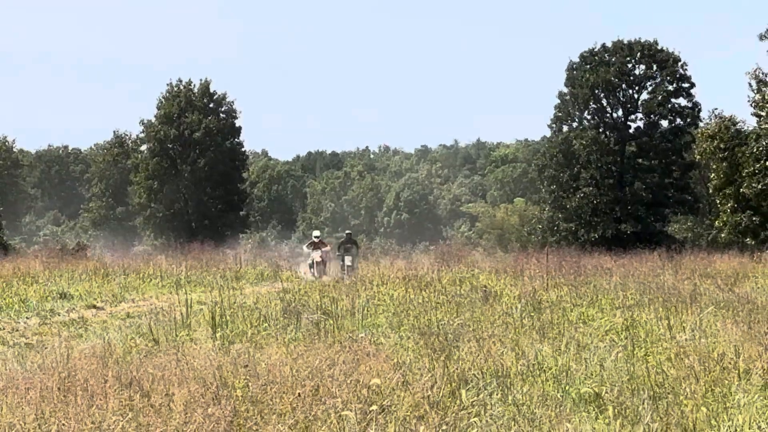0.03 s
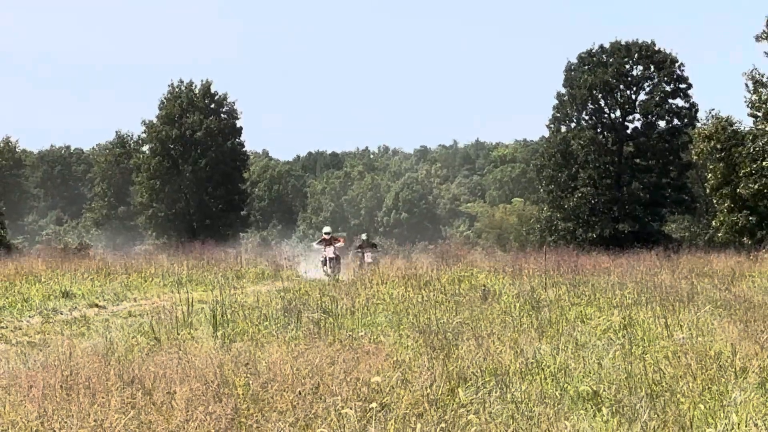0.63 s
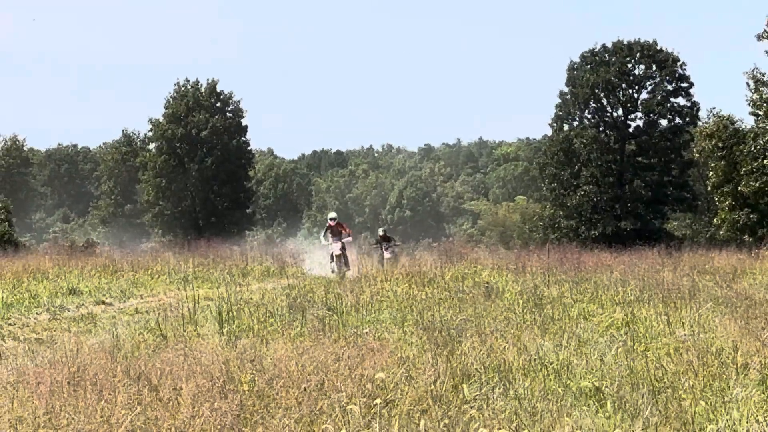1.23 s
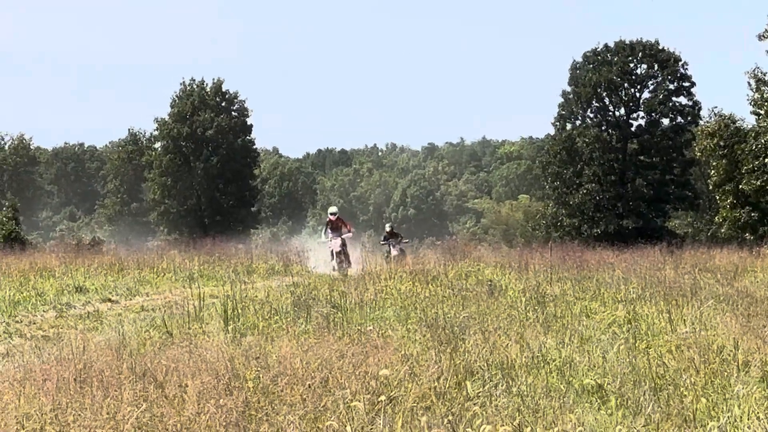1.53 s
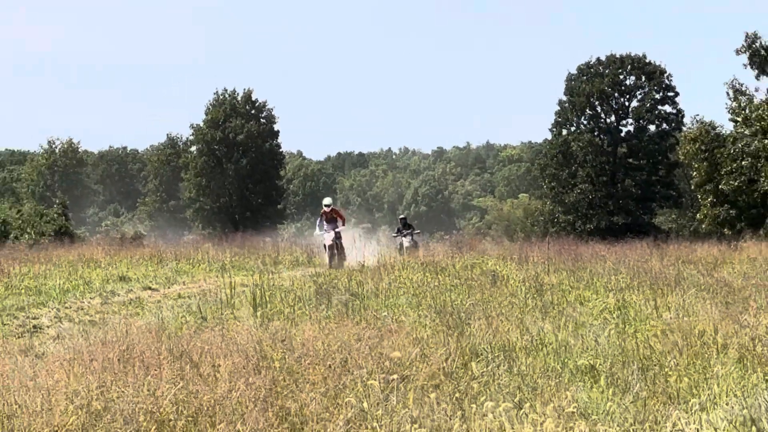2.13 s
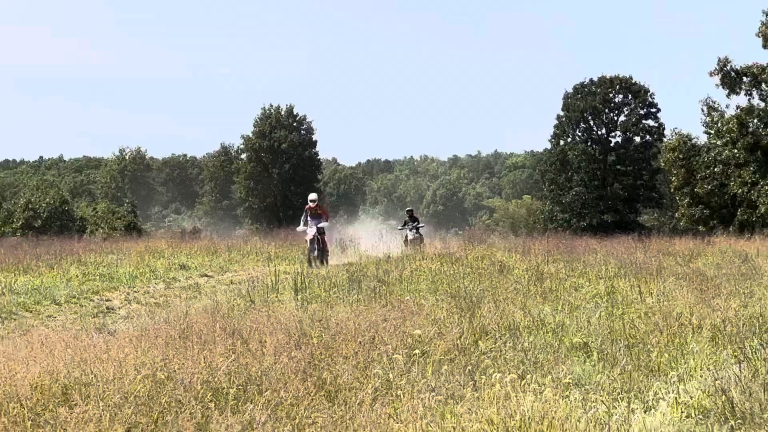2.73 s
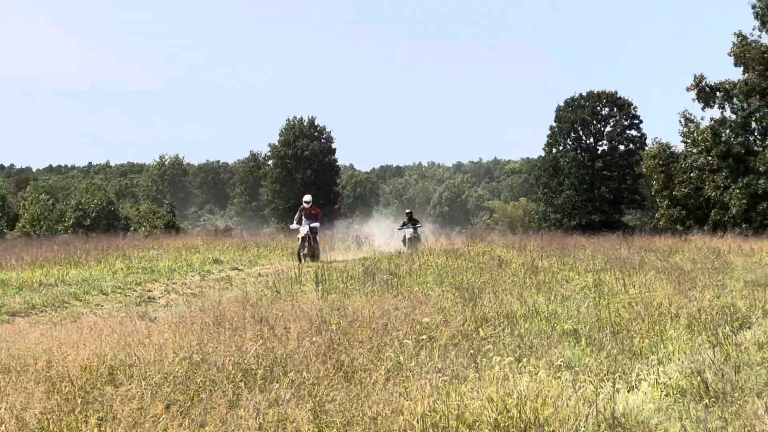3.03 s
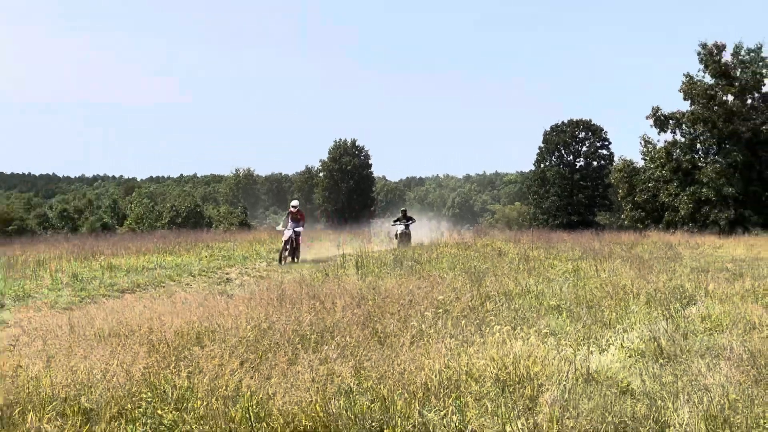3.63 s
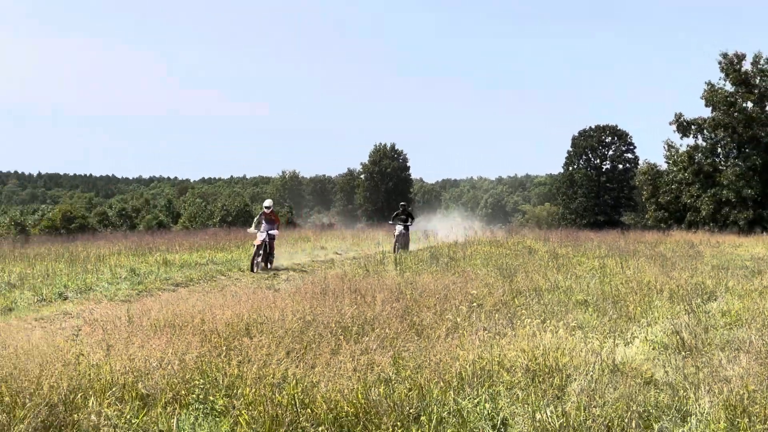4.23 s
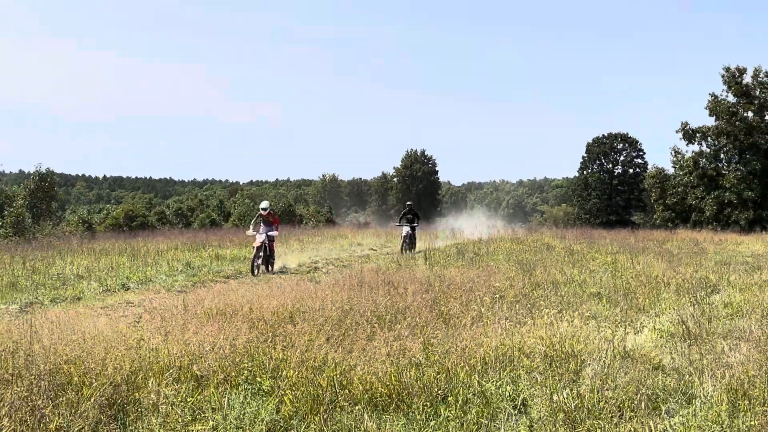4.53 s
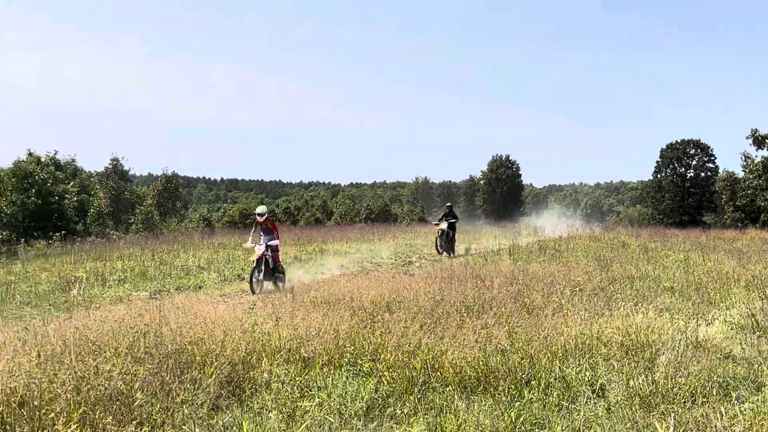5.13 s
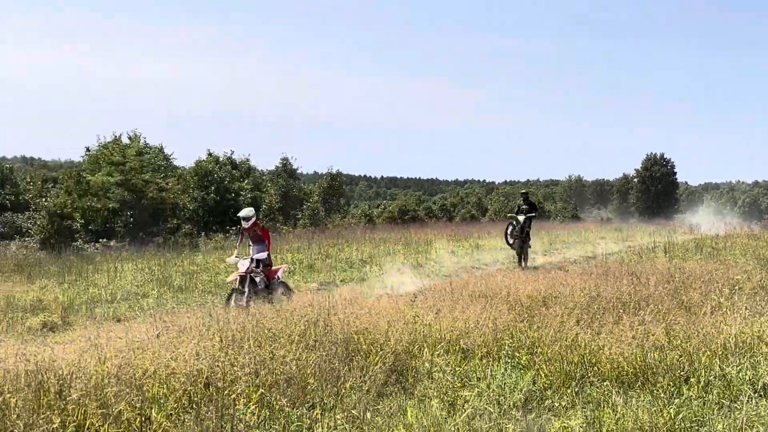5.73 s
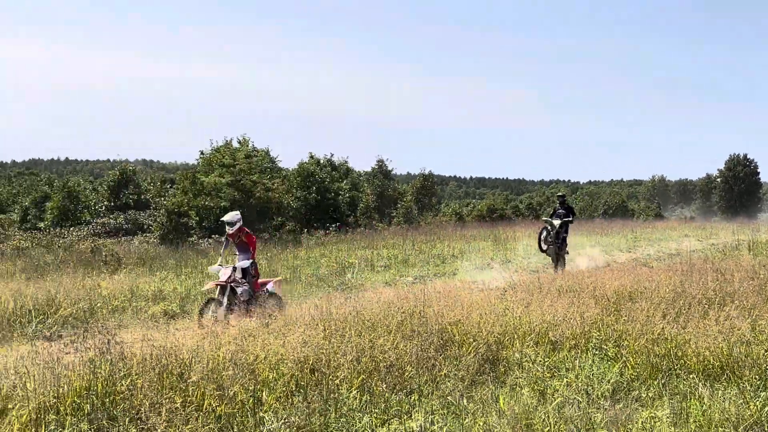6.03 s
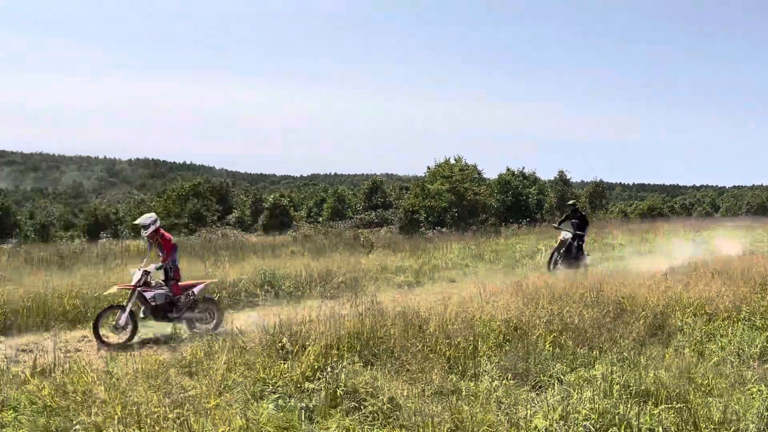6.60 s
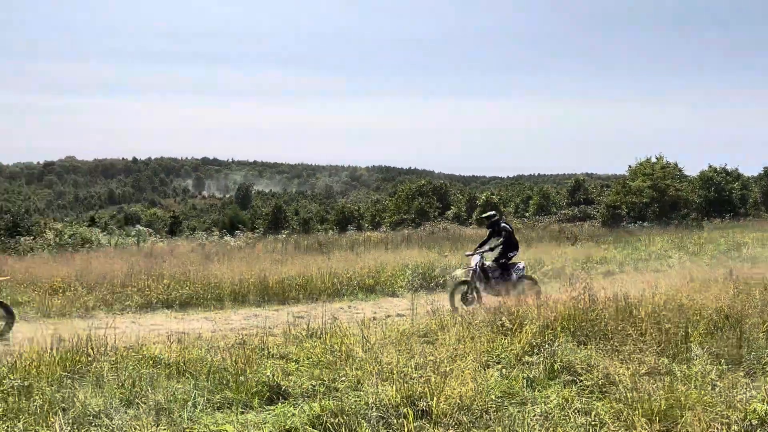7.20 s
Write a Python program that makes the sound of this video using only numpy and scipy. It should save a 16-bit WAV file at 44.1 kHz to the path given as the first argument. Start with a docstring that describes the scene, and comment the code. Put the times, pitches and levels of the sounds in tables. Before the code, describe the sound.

Two dirt bikes approach across an open field, revving in bursts and growing loud as they pass, over insects and low wind rumble.

```python
"""Two dirt bikes crossing a field

The leader blips its throttle and coasts past; the second follows, its revs rising and sagging over bumps.
Each exhaust is a periodic source, radiating orders (harmonics) of its firing rate. The firings also
modulate the noise of gas puffs and engine rasp, and chains and tyres hiss as the distance closes.
Insects buzz and tick in the grass over a low rumble of wind and far engines."""
import sys
import numpy as np
from scipy.fft import rfft, irfft, next_fast_len
from scipy.io import wavfile
from scipy.ndimage import uniform_filter1d, map_coordinates

SR = 44100
rng = np.random.default_rng(int(sys.argv[2]) if len(sys.argv) > 2 else 0)


def wav_out(sig):
    """Save sig, one row per channel (or a flat mono array), as 16-bit PCM at SR to the path in sys.argv[1]."""
    wavfile.write(sys.argv[1], SR, np.round(np.clip(np.atleast_2d(sig).T, -1, 1) * 32767).astype(np.int16))


N = 324576
TIME = np.arange(N) / SR

# strength of the rumble (time [s], level [dB])
RUMBLE_LEVEL = [(0, -37.5), (2.9, -37), (4.7, -36.5), (6.5, -35.5), (7.36, -27.5)]
# low thuds: air bumping the microphone at 3.16 s, the second bike's front wheel landing at 6.52 s (time [s],
# half-length [s], level [dB])
THUDS = [(3.16, 0.044, -26), (6.52, .025, -25)]
# spectra of the rumble and the far engines' murmur (frequency [Hz], relative density [dB])
RUMBLE_SPECTRUM = [(15, -35.5), (25, -56), (43, 4), (102, 1), (145, 2.5), (164, 1.5), (179, -12.5),
                   (203, -6.5), (248, -18.5), (281, -28.5), (311, -26), (500, -41), (650, -49),
                   (1100, -120)]
MURMUR_SPECTRUM = [(150, -14), (260, 8), (400, -0.5), (580, 0), (720, -7.5), (900, -8), (1100, -11),
                   (1350, -7), (2000, -57)]
# spectra of the insects (frequency [Hz], relative density [dB])
CHORUS_SPECTRUM = [(6400, -33), (7000, -13.5), (8000, 5), (8720, 8), (8950, -25), (9500, -30), (10600, -17),
                   (14000, -23.5), (15500, -14)]
BUZZER_SPECTRUM = [(6000, -12.5), (9000, -0.5), (10700, 10), (12000, 6), (14000, -3), (15600, -1)]
TICK_SPECTRUM = [(4000, -16), (8000, -9), (10000, 10.5), (14000, -2), (16000, 5)]
# ticks in the grass (time [s], relative peak level [dB])
TICKS = [(1.3693, -55), (1.998, -50.5), (2.0971, -54), (2.2333, -62), (2.386, -53), (2.507, -47.5),
         (2.6763, -47), (2.813, -54), (2.953, -56), (3.259, -54)]

# spectra of gas puffs, engine rasp and chain and tyre hiss (frequency [Hz], relative density [dB])
PUFF_SPECTRUM = [(150, -6), (260, 10), (400, -1), (500, -4.5), (620, 1), (850, -3), (1100, -7.5),
                 (1350, -1), (2000, -77)]
RASP_FAR = [(590, -27), (1000, -24), (1190, -15), (1360, -2), (1530, 4.5), (2070, -2.5), (2540, -3),
            (2920, -9), (3600, -10), (4680, -34), (7920, -120)]
RASP_HEAD_ON = [(590, -33), (1000, -10.5), (1290, -5), (1370, -7), (1470, 2.5), (1640, 0), (1980, -2.5),
                (2140, 0), (2560, -7.5), (2830, -4), (3800, -19), (4940, -44.5), (8360, -120)]
RASP_NEAR = [(590, -46), (1000, -3.5), (1180, 2), (1380, -2.5), (1470, 5.5), (1960, 6.5), (2290, -4.5),
             (2540, 2), (3070, -10), (3600, -18), (4680, -45), (7920, -120)]
RASP_ABEAM = [(590, -34), (1000, 8), (1220, 7), (1580, -0.5), (1760, 8.5), (1920, 0), (2270, 7.5),
              (2450, -2), (2660, 5.5), (3020, -10.5), (3400, -4.5), (4420, -39), (7480, -120)]
HISS_AHEAD = [(2400, -28.5), (3200, 0), (4000, 2), (5200, 2), (6600, 1), (7600, -2), (9500, -8.5),
              (11000, -16), (13500, -10), (16000, -14)]
HISS_ABEAM = [(2500, -45), (3200, -5), (4000, 2), (5200, 2.5), (6000, 6.5), (6700, 2.5), (8000, -1.5),
              (9500, -7), (11000, -26), (13500, -10), (16000, -11.5)]
# surges of rasp and hiss (time [s], half-length [s], added part re steady level [dB])
SURGES = [(4.55, 0.14, -5), (5.47, 0.057, -4.5), (5.89, 0.027, -6.5), (6.26, 0.011, -32),
          (6.41, 0.013, -23.5)]

# the second engine's revs (time [s], firing rate [Hz])
SECOND_REVS = [(0, 55), (.42, 55.5), (.63, 63), (.76, 62), (.95, 55), (2, 57), (2.25, 62), (2.6, 58),
               (2.9, 62), (3.27, 59.5), (3.42, 66.5), (3.5, 61), (3.6, 62.6), (3.75, 62), (3.88, 64),
               (4.15, 63.8), (4.22, 60.3), (4.42, 65), (4.58, 66), (4.75, 60), (4.85, 60.4), (4.91, 59.3),
               (4.97, 60), (5.3, 61), (5.6, 58.5), (5.84, 65), (6.2, 60), (6.51, 57), (6.58, 58.6),
               (6.72, 59.8), (6.8, 63.8), (6.88, 55.5), (7.05, 60.8), (7.17, 55.5), (7.28, 63.5),
               (7.36, 55.3)]
# its throttle twists (time [s], hold [s], opening [0-1], extra exhaust level [dB])
SECOND_TWISTS = [(.5, .41, 0, 11), (2.68, .4, .5, 3), (3.28, .15, .3, 5), (3.49, .5, 0, 4),
                 (4, .18, .55, 5.5), (4.29, .33, .65, 6.5), (4.68, .36, .5, -1), (5.1, .24, .1, 4),
                 (5.68, .16, 1, 3), (6.54, .17, 0, 6.5), (6.71, .09, 0, 5.5), (6.93, .15, .4, 2.5),
                 (7.19, .17, .3, 3)]
# harmonics of its pipe and its gears (order [x firing rate], relative level [dB])
SECOND_ORDERS = [(2, -7), (4, 2), (6, -11), (8, -10), (10, 0), (12, 1.5), (14, -6.5), (16, -10), (18, -13),
                 (20, -10), (22, -24), (28, -27)]
GEAR_ORDERS = [(46, -4), (48, 0)]
# colouring of its pipe by ground reflection (frequency [Hz], gain per doubling of distance [dB])
GROUND_REFLECTION = [(250, -1), (500, 0), (630, 1.2), (760, 0), (890, 1), (1020, -4.5), (1130, -3.5),
                     (1260, 0)]
# booms in its pipe at short throttle twists (time [s], level [dB])
PIPE_BOOMS = [(2.22, -50.5), (2.82, -48.5), (3.38, -54)]
# casing resonances that its whine sweeps through (frequency [Hz], gain [dB])
CASING_RESPONSE = [(1300, -14), (1450, -5), (1720, 2), (2000, -9), (2380, -13), (2600, -21), (2860, -15),
                   (3150, -26), (3540, -15), (3900, -24)]
# swells of its whine and its gears' song (time [s], half-length [s], level [dB])
WHINE_SWELLS = [(4.42, 0.13, -50.5), (4.9, 0.33, -49), (5.6, 0.25, -43), (6.9, .25, -56)]
GEAR_SWELLS = [(4.29, .06, -60), (4.9, .17, -47)]
# its intake rattle from afar (time [s], level [dB])
INTAKE_LEVEL = [(.1, -59), (.5, -55.5), (.64, -52.5), (.73, -52), (.84, -65), (1.05, -66), (1.12, -57.5),
                (1.25, -62.5), (1.45, -65), (1.55, -71), (1.7, -73), (2.3, -58.5), (3.05, -57), (3.4, -76),
                (4, -92)]
# resonance of its airbox (frequency [Hz], relative density [dB])
AIRBOX_SPECTRUM = [(800, -28), (1200, -3.5), (1500, 8.5), (1850, -0.5), (2200, -24), (3000, -50)]

# the leader's throttle blips (time [s], hold [s], opening [0-1], target firing rate [Hz],
# spin-up [s], coast-down [s], extra exhaust level [dB])
LEAD_BLIPS = [(3.87, 0.14, 0.65, 83, 0.095, 0.078, 5), (4.895, .17, 1, 93.5, .09, .24, -.5),
              (5.06, .32, .7, 66, .15, .2, 1), (5.52, .13, .7, 68.5, .07, .12, -2),
              (5.825, .21, .95, 69, .06, .22, -3), (6.19, .17, 1, 71, .055, .1, -1.5),
              (6.36, .11, 1, 72.4, .04, .3, .5), (6.49, .3, 0.02, 55.7, 0.12, 0.056, 6),
              (6.889, .15, 0.07, 62, .03, 0.38, 9), (7.03, 0.3, 0.12, 53.4, .22, 0.29, 8.5)]
# response of its pipe, throttle shut and open (frequency [Hz], gain [dB])
PIPE_SHUT = [(55, -24.5), (70, -9), (100, -10), (120, 2.5), (160, -5), (185, -10), (240, -11.5),
             (300, -14.5), (400, -25)]
PIPE_OPEN = [(70, -10.5), (90, -7.5), (135, -5), (185, 2.5), (215, 0.5), (265, 9), (290, -6.5), (345, -7),
             (375, -13), (450, -17)]
# overtone peaks of its pipe (frequency [x PIPE_TUNED_HZ], gain [dB])
PIPE_OVERTONES = [(6, -14), (7, -5), (8, -7), (10.4, 0), (11.5, -8), (13, -7), (14.4, -4), (15.5, -10),
                  (17.3, -4), (23, -12), (28, -17), (40, -22)]
# colouring of its pipe by the grass (frequency [Hz], gain per doubling of distance [dB])
GRASS_RESPONSE = [(160, 0), (210, 1.5), (260, -4), (350, -4)]
# barks of its intake (time [s], half-length [s], level [dB])
BARKS = [(4, .035, -54.5), (5.01, 0.014, -39), (5.12, 0.15, -36), (5.88, .03, -29.5), (6.41, 0.1, -25.5)]
# spectrum of a bark (frequency [Hz], relative density [dB])
BARK_SPECTRUM = [(250, -22), (400, -10), (700, -2), (1150, -1.5), (1400, -1), (1700, 4), (2050, -9),
                 (3000, -15.5), (5500, -13), (8000, -33)]

# left-right likeness of noise from ahead and side-on (frequency [Hz], coherence [0-1])
COHERENCE_AHEAD = [(200, .99), (700, .85), (1200, .7), (1650, .45), (2200, .95), (3300, .9), (4000, .99)]
COHERENCE_ABEAM = [(800, .8), (1400, .5), (1900, .4), (2500, .7), (7000, .5), (9000, .85), (13000, .97)]
# contrast of the two microphone ports (frequency [Hz], left phase lead [rad], left minus right [dB])
PORTS_FAR = [(300, 0, 0), (700, 0, -1.5), (1200, -1.7, -7), (1650, -1.5, -6), (2100, 0, 0)]
PORTS_NEAR = [(700, 0, 0), (950, -.4, -3), (1300, -.7, -2), (1650, -1.3, -1.2), (1900, -.5, 2.5),
              (2300, 0, .8), (3200, .4, .4), (4000, 0, .2)]
PORTS_ABEAM = [(400, 0, .6), (550, .6, 2.7), (800, .6, 3.7), (1100, .9, 0), (1550, 1.8, -4), (2200, 0, -1),
               (3200, .8, 2), (4400, 0, .5), (6000, .3, 4.5), (9000, 0, 0)]
# treble phase between the channels (frequency [Hz], left phase lead [rad])
TREBLE_PHASE = [(6800, 0), (7450, 3.14), (7900, 5.4), (8300, 6.1), (9200, 5.9), (10200, 3.6), (12200, 3),
                (13400, 0)]

# straight passes (time abeam [s], speed [m/s], closest distance [m])
LEAD_PASS, SECOND_PASS = (6.578, 7.76, 6.3), (7.452, 7.54, 6.49)
# level laws (gain when closest [dB], loss per doubling of distance [dB], rise at full throttle [dB])
LEAD_NOTE_LAW, LEAD_OVERTONE_LAW = (-28.5, 6.73, 10.6), (-50, 9.3, 14.5)
PUFF_LAW, DRONE_LAW = (-30, 12.2, 4.6), (-35, 13, 1.5)
LEAD_RASP_LAW, SECOND_RASP_LAW = (-30.5, 12.1, 3.8), (-26, 13.5, 10.8)
LEAD_HISS_LAW, SECOND_HISS_LAW = (-35, 15.15, 2.44), (-31, 19, 7.9)

LEAD_IDLE_HZ, PIPE_TUNED_HZ = 51.97, 66.8  # firing rates


def amp(db):
    """Amplitude ratio: a factor of ten per 20 dB."""
    return 10 ** (np.asarray(db) / 20)


def unit(x):
    """Normalisation to rms 1."""
    return x / np.sqrt(np.mean(x ** 2) + 1e-20)


def along(points, hz):
    """Interpolation of (frequency, value) points on a logarithmic axis."""
    freqs, values = np.transpose(points)
    return np.interp(np.log(hz + 1e-3), np.log(freqs), values)


def curve(points):
    """Linear interpolation of (time, value) points at every sample."""
    return np.interp(TIME, *np.transpose(points))


def wobble(knots_hz):
    """Smooth random modulation: a spline through Gaussian knots."""
    return map_coordinates(rng.standard_normal(int(N * knots_hz / SR) + 4), [TIME * knots_hz])


def swells(rows):
    """Superposition of Gaussian envelopes."""
    return sum(amp(db) * np.exp(-((TIME - s) / half) ** 2) for s, half, db in rows)


def crossfade(times):
    """Linear cross-fade: weights that sum to one, one peaking at each time."""
    return np.array([np.interp(TIME, times, row) for row in np.eye(len(times))])[:, None]


def held_moves(rest, moves):
    """Relaxation: a control nears each target while held, then decays exponentially to rest."""
    value = np.full(N, float(rest))
    for start, held, target, attack, release in moves:
        i = min(int(start * SR), N - 1)
        age = TIME[i:] - start
        reached = target + (value[i] - target) * np.exp(-(np.minimum(age, held) / attack) ** 2)
        value[i:] = rest + (reached - rest) * np.exp(-np.maximum(age - held, 0) / release)
    return value


def filtered(x, response):
    """Linear filtering: the spectrum is multiplied by a frequency response."""
    size = next_fast_len(N + 8192)
    return irfft(rfft(x, size) * response(np.fft.rfftfreq(size, 1 / SR)), size)[..., :N]


def noise(spectrum, coherence=COHERENCE_AHEAD, ring=0, gate=1):
    """Source-filter model: noise plus a ring is gated, then coloured into stereo of rms 1."""
    def response(hz):
        angle = np.arccos(np.clip(along(coherence, hz), -1, 1)) / 2
        return amp(along(spectrum, hz)) * [np.cos(angle), np.sin(angle)]
    mid, side = filtered(gate * (rng.standard_normal((2, N)) + ring), response)
    return unit(np.array([mid + side, mid - side]))


def count_cycles(rate_hz, jitter):
    """Phase in cycles is the integral of rate; jitter makes each cycle early or late."""
    return np.cumsum(rate_hz) / SR + jitter * wobble(60)


def bursts(cycles, decay, depth, scatter_db, smoothing=60):
    """Pulse modulation: the gain jumps by a random amount each cycle and decays exponentially."""
    strengths = amp(scatter_db * rng.standard_normal(4096))[np.abs(cycles).astype(int)]
    pulses = strengths * unit(np.exp(-(cycles % 1) / decay))
    return unit(uniform_filter1d(1 - depth + depth * pulses, smoothing))


def partial(cycles, order):
    """One harmonic of rms 1, with the phase lag of the pipe."""
    phase = 2 * np.pi * (order * cycles % 1) - np.sqrt(order) * np.pi
    return np.sqrt(2) * np.sin(phase.astype(np.float32))


def vibration(cycles, size=512):
    """Quasi-periodic vibration: each cycle shakes the machine in nearly the same way; two signals."""
    shape = lambda: np.interp(cycles % 1, np.arange(size) / size, rng.standard_normal(size))
    drift = 1.67 * wobble(3)
    return unit(np.array([np.cos(drift) * shape() + np.sin(drift) * shape() for _ in range(2)]))


def ride(rate, twists, path, open_s=.039, shut_s=.045):
    """Uniform straight motion: gives firing rate, extra dB and state (throttle, distance doublings)."""
    throttle = held_moves(0, [(s, held, opening, open_s, shut_s) for s, held, opening, *_ in twists])
    extra_db = held_moves(0, [(s, held, db, open_s, shut_s) for s, held, *_, db in twists])
    abeam_s, speed, closest = path
    doublings = np.log2(np.hypot(closest, speed * (TIME - abeam_s)) / closest)
    hunting = (.002 + .001 * doublings) * wobble(12)
    return rate * (1 + hunting), extra_db, (throttle, doublings)


def heard(law, throttle, doublings):
    """Power-law attenuation over distance and grass; an open throttle raises the level."""
    closest_db, loss_db, open_db = law
    return amp(closest_db - loss_db * doublings + open_db * throttle)


def at_ports(sound, ports):
    """Direction cues: phase and level differ at two microphone ports whose responses sum to a constant."""
    freqs, lead_rad, tilt_db = np.transpose(ports)
    def response(hz):
        ratio = amp(np.interp(hz, freqs, tilt_db)) * np.exp(1j * np.interp(hz, freqs, lead_rad))
        return 2 * np.array([ratio, np.ones_like(ratio)]) / (1 + ratio)
    return filtered(sound, response)


def rumble():
    """Low-frequency noise of wind and far engines; a puff of air bumps the microphone, and later the second
    bike's front wheel lands with a thud."""
    bed = amp(curve(RUMBLE_LEVEL) + 2) * noise(RUMBLE_SPECTRUM, [(100, .96)])
    thud = noise([(25, -20), (40, -16), (60, 7), (80, -2.5), (160, -29), (400, -88)], [(100, .83)])
    return bed + swells(THUDS) * thud


def insects(flutter_hz=30.3, tick_s=.004):
    """Amplitude-modulated noise: a chorus near 8 kHz, a higher buzzer that stops, and sparse ticks."""
    cycles = count_cycles(np.full(N, flutter_hz), jitter=.15)
    flutter = unit(amp(np.sin(2 * np.pi * cycles) + 1.7 * wobble(180) + .38 * wobble(35)))
    chorus = amp(-57.5 + .2 * wobble(2)) * flutter * noise(CHORUS_SPECTRUM, [(8000, 1)])
    buzzer_db = np.interp(TIME, [0, .8, 1.15, 1.27], [-58, -55.5, -53.5, -100])
    buzzer = amp(buzzer_db + 1.3 * wobble(25)) * noise(BUZZER_SPECTRUM, [(10000, 1)])
    snaps = sum(amp(db) * np.exp(-np.abs(TIME - s) / tick_s) for s, db in TICKS)
    ticks = amp(-3 + 2.1 * wobble(500)) * snaps * noise(TICK_SPECTRUM, [(10000, .92)])
    return chorus + buzzer + ticks


def murmur():
    """Stationary noise: the engines' murmur carries over the whole field."""
    return amp(-58.5) * noise(MURMUR_SPECTRUM)


def chain_and_tyre_hiss(lead_state, second_state, buzz):
    """High-frequency absorption: distance and grass dull the hiss until the bikes are close."""
    gain = np.hypot(heard(LEAD_HISS_LAW, *lead_state), heard(SECOND_HISS_LAW, *second_state))
    colours = [noise(HISS_AHEAD, ring=.5 * buzz), noise(HISS_ABEAM, COHERENCE_ABEAM, ring=.057 * buzz)]
    hiss = gain * amp(1.1 * wobble(15)) * np.sum(np.sqrt(crossfade([6.4, 6.95])) * colours, axis=0)
    dull = filtered(hiss, lambda hz: 1 / (1 + (hz / 8000) ** 8))
    closeness = np.interp(TIME, [4.6, 6.2], [.15, 1])
    return closeness * hiss + (1 - closeness) * dull


def engine_rasp(lead_state, second_state, buzz, second_cycles):
    """Incoherent sources add in power; their colour shifts as the bikes near and turn side-on."""
    near_gain = np.hypot(heard(LEAD_RASP_LAW, *lead_state), heard(SECOND_RASP_LAW, *second_state))
    far_gain = np.hypot(amp(-57), amp(curve(INTAKE_LEVEL) - 9))
    gain = np.hypot(near_gain, far_gain) * amp(.14 * wobble(7.6))
    # head-on, the second bike's open throttle snarls
    snarl = np.interp(TIME, [5, 5.7], [.9, .3]) * vibration(2 * second_cycles, size=256)[0]
    colours = [amp(-7.5) * noise(RASP_FAR),
               amp(-3) * noise(RASP_HEAD_ON, ring=buzz + snarl),
               amp(.5) * noise(RASP_NEAR, ring=buzz),
               amp(-3.5) * noise(RASP_ABEAM, COHERENCE_ABEAM, ring=buzz)]
    return gain * np.sum(np.sqrt(crossfade([3.4, 4.7, 6.3, 6.95])) * colours, axis=0)


def gas_puffs(lead_state, buzz, beat):
    """Pulsating flow: noise gated by the firings, its level following the leader."""
    gain = heard(PUFF_LAW, *lead_state) * amp(-1 + .3 * wobble(14))
    return gain * noise(PUFF_SPECTRUM, ring=.3 * buzz, gate=beat)


def machine_noise(lead_cycles, second_cycles, lead_state, second_state):
    """Common modulation: puffs, rasp and hiss all pulse in step with the engines."""
    lead_beat = bursts(lead_cycles, decay=.93, depth=.063, scatter_db=9)
    second_beat = bursts(second_cycles, decay=.92, depth=.17, scatter_db=8)
    beat = unit(lead_beat + .6 * second_beat)
    clatter = bursts(2 * lead_cycles, decay=.94, depth=.15, scatter_db=5.5)
    # the second engine rattles once per turn of its crank, twice per firing
    buzz = 1.1 * vibration(lead_cycles) + .85 * vibration(2 * second_cycles, size=256)
    rasp = beat * engine_rasp(lead_state, second_state, buzz, second_cycles)
    hiss = clatter * chain_and_tyre_hiss(lead_state, second_state, buzz)
    return gas_puffs(lead_state, buzz, beat) + (1 + swells(SURGES)) * (rasp + hiss)


def second_intake(cycles):
    """Impulse excitation: each gulp knocks the airbox and trails air; harder pulls are more distinct."""
    level_db = curve(INTAKE_LEVEL)
    depth = np.interp(level_db, [-60, -52], [.45, .88])
    gulps = bursts(cycles, decay=.26, depth=depth, scatter_db=.7, smoothing=100)
    gulp_count = np.floor(cycles - .12)
    knocks = unit(np.diff(gulp_count, prepend=gulp_count[0]))
    ring = .5 * vibration(cycles) + .25 * knocks
    return amp(level_db) * noise(AIRBOX_SPECTRUM, [(1500, .94)], ring=ring, gate=gulps)


def wavering(cycles, order, db):
    """Slow amplitude modulation of one harmonic about a mean level."""
    return amp(db + 1.8 * wobble(16)) * partial(cycles, order)


def second_whine(cycles, rate):
    """Forced resonance: high even orders sweep through the casing's modes; the gears sing on two."""
    rattling = cycles + .005 * wobble(250)
    casing = sum(wavering(rattling, k, along(CASING_RESPONSE, k * rate)) for k in range(22, 64, 2))
    gears = sum(wavering(cycles, k, db) for k, db in GEAR_ORDERS)
    return swells(WHINE_SWELLS) * casing + swells(GEAR_SWELLS) * gears


def second_exhaust(cycles, rate, extra_db, throttle, doublings):
    """A harmonic drone, mostly even orders, coloured by ground reflection; the fourth order booms."""
    ragged = cycles + .0022 * wobble(120)
    def tone(k):
        db = along(SECOND_ORDERS, k) + along(GROUND_REFLECTION, k * rate) * doublings
        return wavering(ragged, k, db)
    even = sum(tone(k) for k in range(2, 30, 2))
    odd = amp(-9 - 3.5 * doublings) * sum(tone(k) for k in range(5, 19, 2))  # rougher as it nears
    ground_db = np.interp(TIME, [3.2, 3.33], [-11.5, 0])  # the ground swallows the far drone
    gain = heard(DRONE_LAW, throttle, doublings) * amp(extra_db + ground_db + 1.1 * wobble(45))
    booms = swells([(s, .084, db) for s, db in PIPE_BOOMS]) * partial(cycles, order=4)
    return gain * (even + odd) + booms


def lead_intake(cycles):
    """Chopped airflow: the intake barks at the firing rate as the throttle snaps open."""
    gulps = bursts(cycles, decay=.3, depth=.65, scatter_db=2)
    return swells(BARKS) * noise(BARK_SPECTRUM, ring=.6 * vibration(cycles), gate=gulps)


def lead_exhaust(cycles, rate, extra_db, throttle, doublings):
    """Pipe resonance shapes five strong low orders and rougher overtones that swell with the throttle."""
    note = overtones = 0
    for k in range(1, 6):
        open_db = along(PIPE_OPEN, k * rate) - 24 * (k == 4)  # an open throttle weakens the fourth
        shut_db = along(PIPE_SHUT, k * rate) + 1.8 * wobble(12)
        grass_db = along(GRASS_RESPONSE, k * rate) * doublings
        note += amp(throttle * open_db + (1 - throttle) * shut_db + grass_db) * partial(cycles, k)
    ragged = cycles + .004 * wobble(140)
    for k in range(6, 40):
        db = along(PIPE_OVERTONES, k * rate / PIPE_TUNED_HZ) + 3.93 * wobble(7)
        overtones += amp(db) * partial(ragged, k)
    note_gain = heard(LEAD_NOTE_LAW, throttle, doublings) * amp(extra_db + .26 * wobble(50))
    return note_gain * note + heard(LEAD_OVERTONE_LAW, throttle, doublings) * overtones


def bikes():
    """Moving sources: the stereo image of both bikes fades from far to head-on, near and side-on."""
    rev_moves = [(s, held, hz, spin_up, coast) for s, held, _, hz, spin_up, coast, _ in LEAD_BLIPS]
    lead_rate, lead_db, lead_state = ride(held_moves(LEAD_IDLE_HZ, rev_moves), LEAD_BLIPS, LEAD_PASS)
    second_rate, second_db, second_state = ride(curve(SECOND_REVS), SECOND_TWISTS, SECOND_PASS)
    lead_cycles = count_cycles(lead_rate, jitter=.004)
    second_cycles = count_cycles(second_rate, jitter=.004)
    sound = murmur() + machine_noise(lead_cycles, second_cycles, lead_state, second_state)
    sound += second_intake(second_cycles) + second_whine(second_cycles, second_rate)
    sound += second_exhaust(second_cycles, second_rate, second_db, *second_state)
    sound += lead_intake(lead_cycles) + lead_exhaust(lead_cycles, lead_rate, lead_db, *lead_state)
    views = [at_ports(sound, PORTS_FAR), sound, at_ports(sound, PORTS_NEAR), at_ports(sound, PORTS_ABEAM)]
    return np.sum(crossfade([3.2, 4.8, 6.4, 6.85]) * views, axis=0)


def scene():
    """Superposition in an open field, with no echo."""
    return bikes() + rumble() + insects()


def record(dry, top_hz=15870):
    """Phase shift and band limit: in the treble, the phase between the channels varies with frequency."""
    def response(hz):
        lead_rad = np.interp(hz, *np.transpose(TREBLE_PHASE))
        return np.exp(.5j * np.array([lead_rad, -lead_rad])) * (hz < top_hz)
    return filtered(dry, response)


dry = scene()
out = record(dry)
wav_out(out)
```